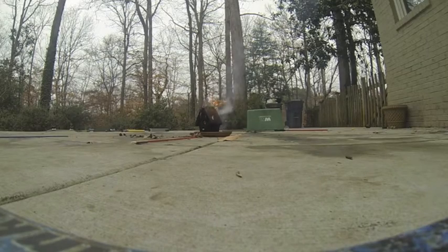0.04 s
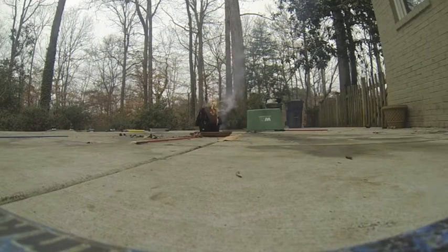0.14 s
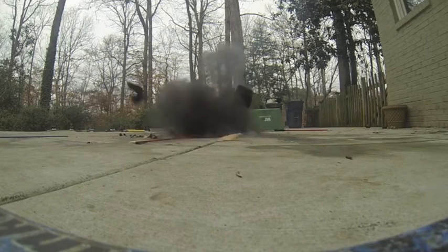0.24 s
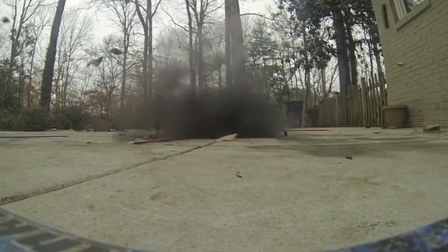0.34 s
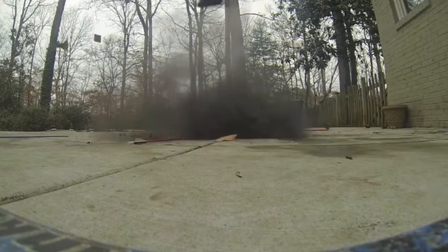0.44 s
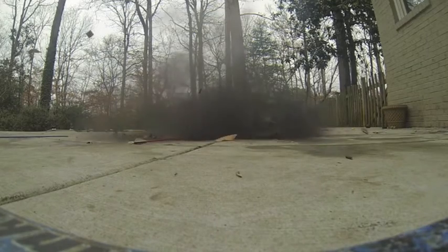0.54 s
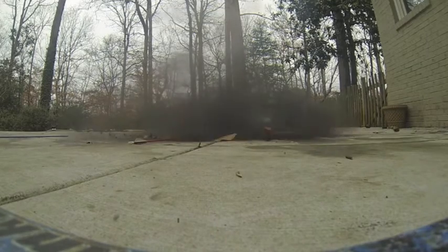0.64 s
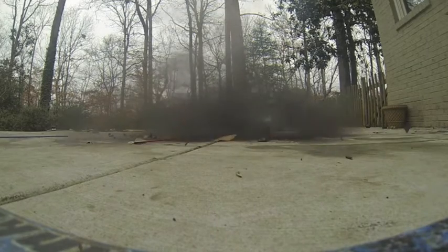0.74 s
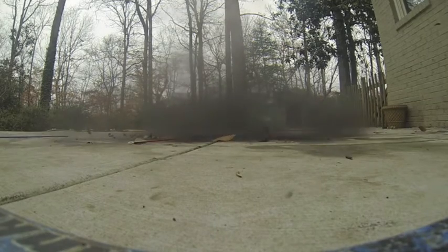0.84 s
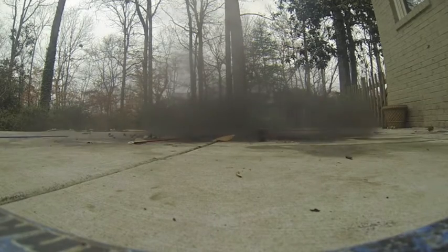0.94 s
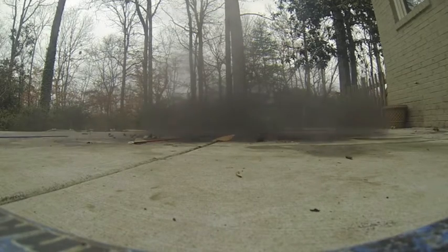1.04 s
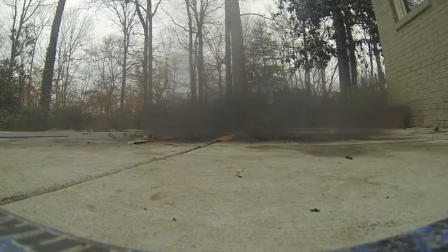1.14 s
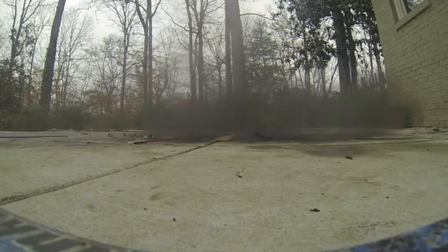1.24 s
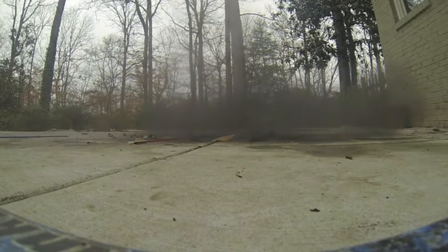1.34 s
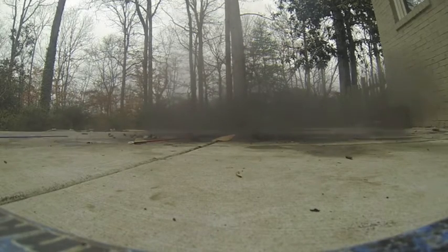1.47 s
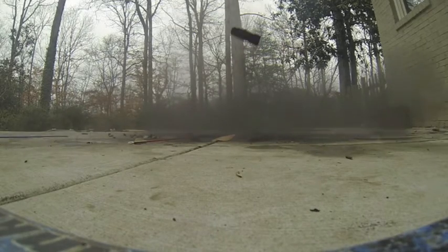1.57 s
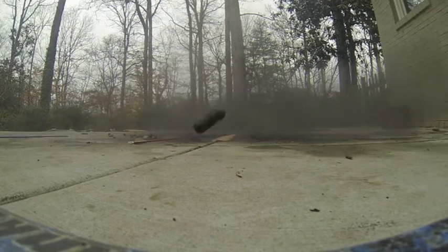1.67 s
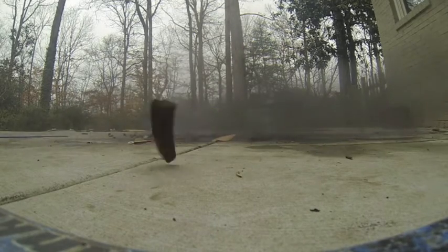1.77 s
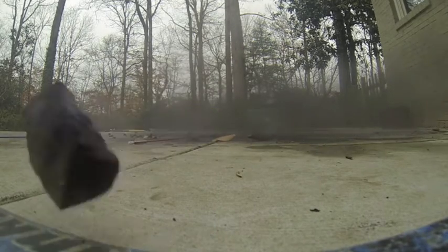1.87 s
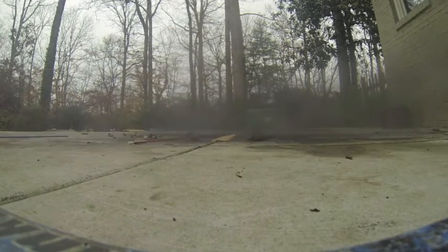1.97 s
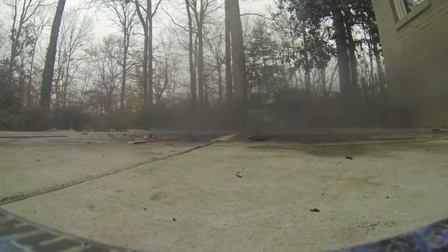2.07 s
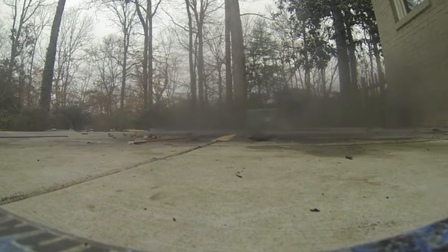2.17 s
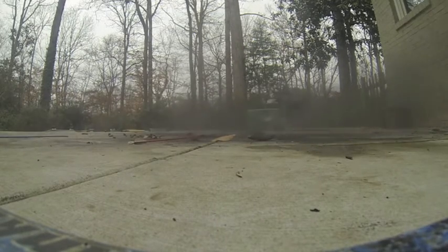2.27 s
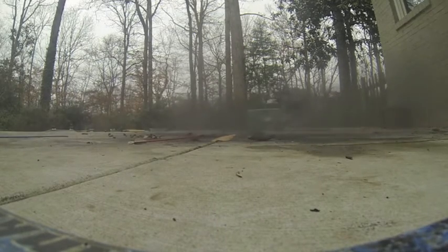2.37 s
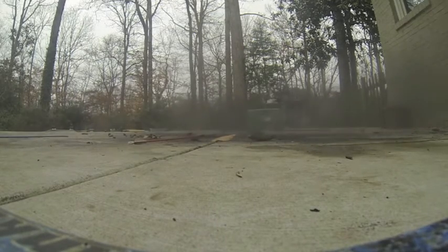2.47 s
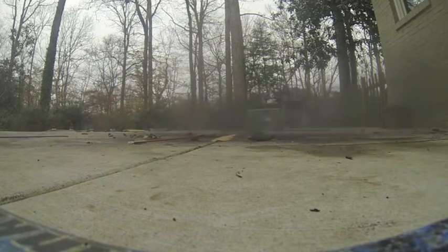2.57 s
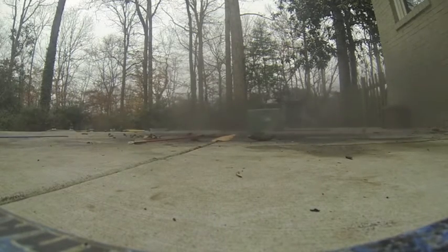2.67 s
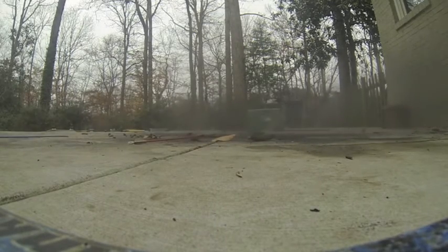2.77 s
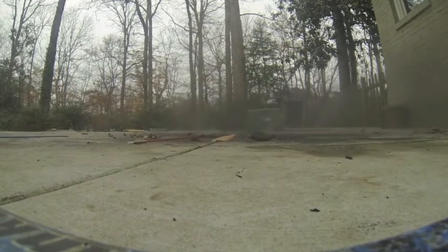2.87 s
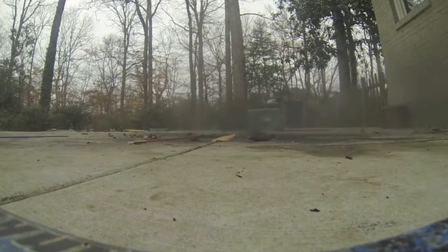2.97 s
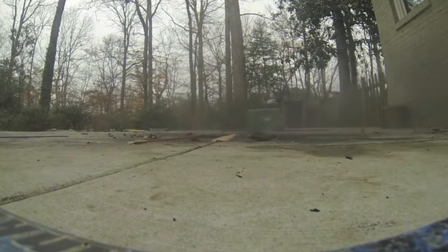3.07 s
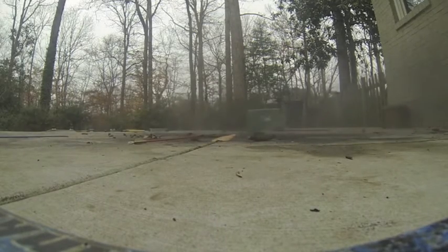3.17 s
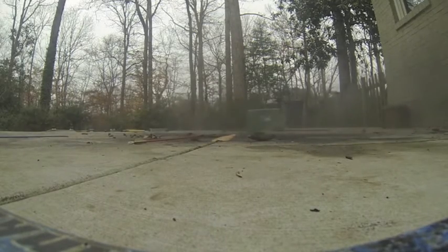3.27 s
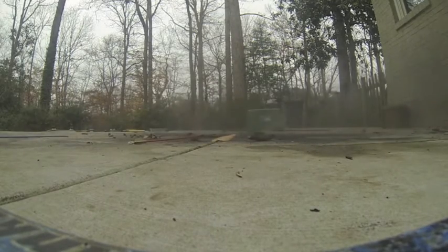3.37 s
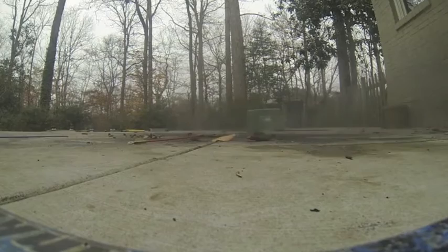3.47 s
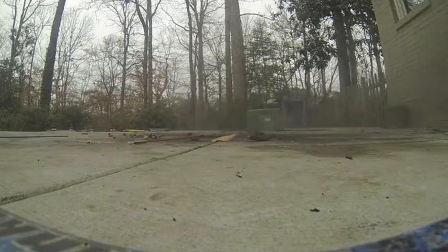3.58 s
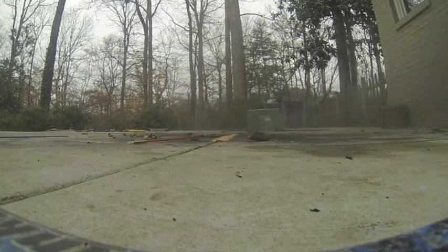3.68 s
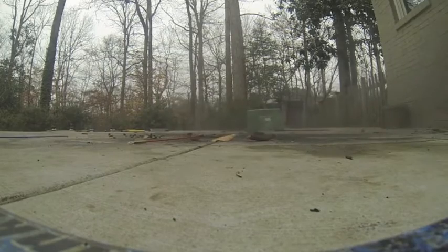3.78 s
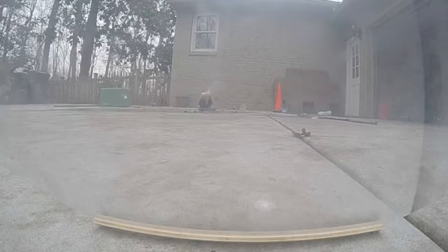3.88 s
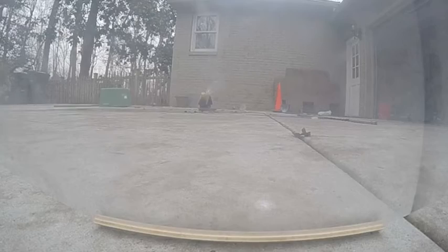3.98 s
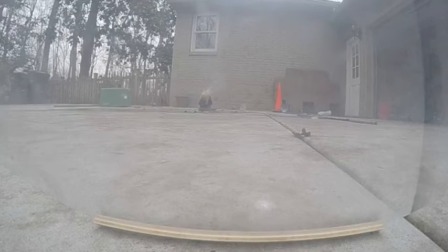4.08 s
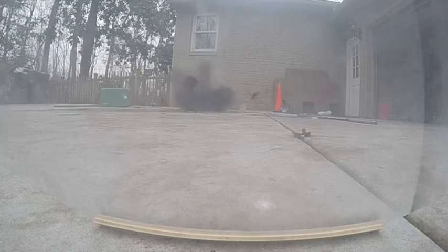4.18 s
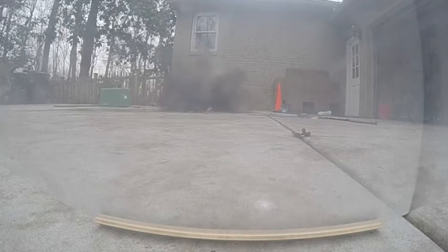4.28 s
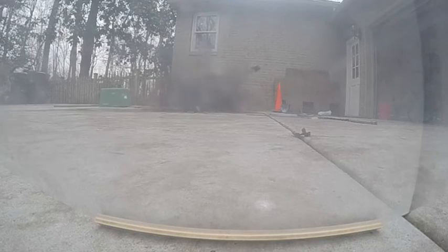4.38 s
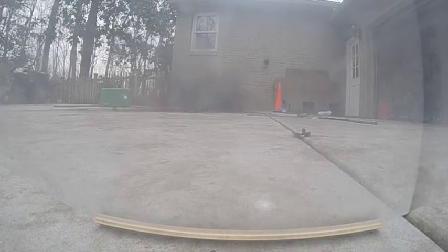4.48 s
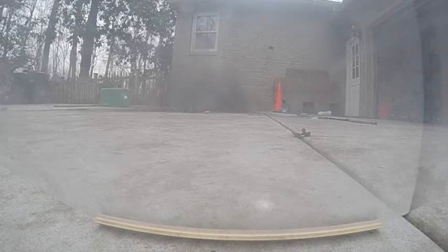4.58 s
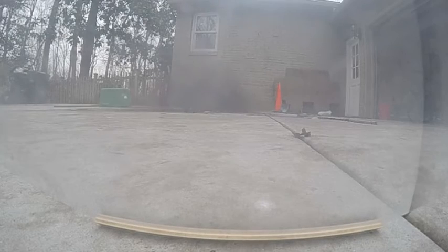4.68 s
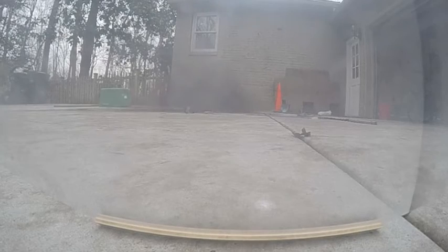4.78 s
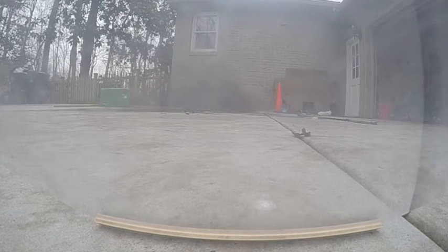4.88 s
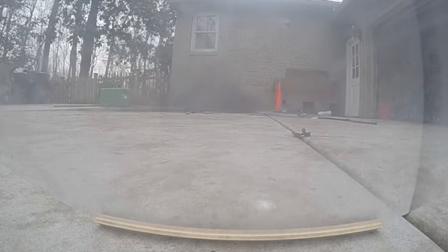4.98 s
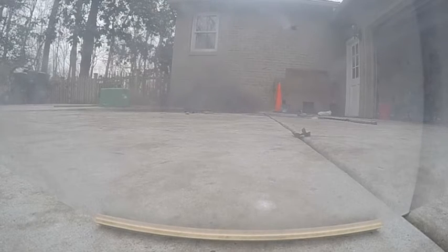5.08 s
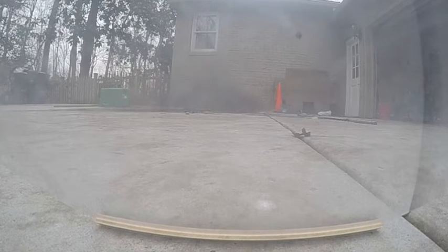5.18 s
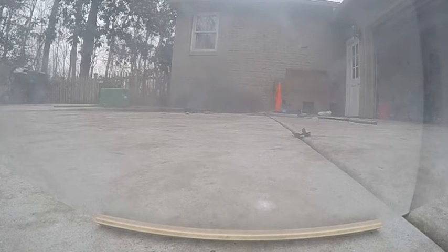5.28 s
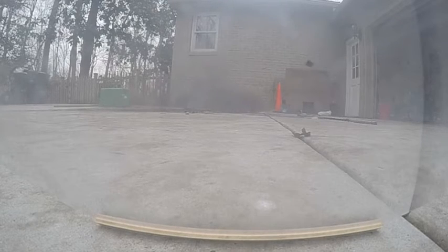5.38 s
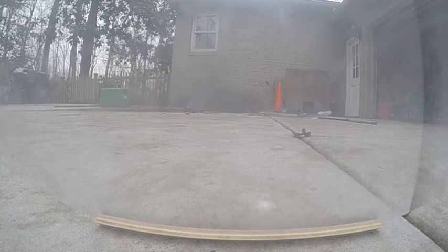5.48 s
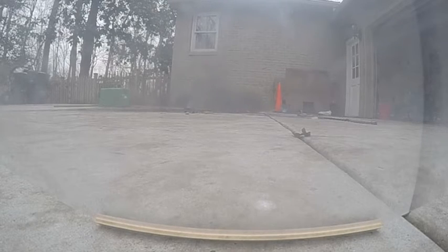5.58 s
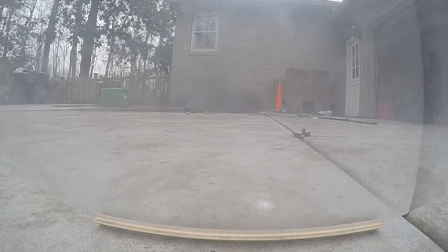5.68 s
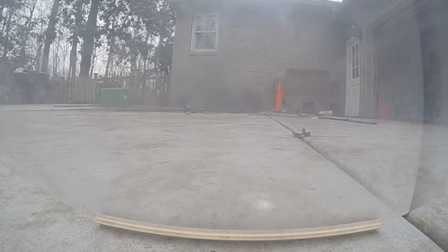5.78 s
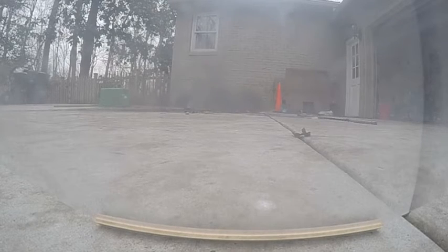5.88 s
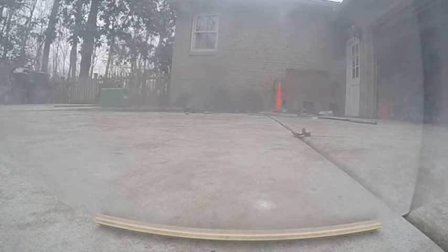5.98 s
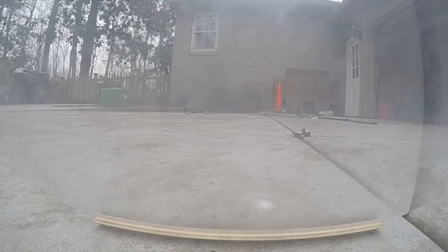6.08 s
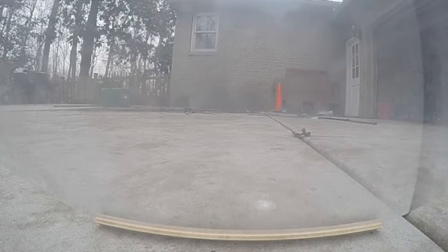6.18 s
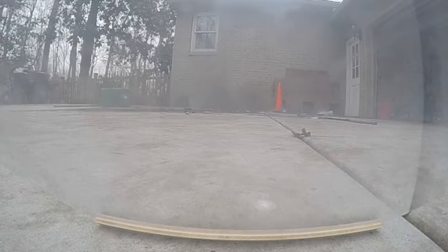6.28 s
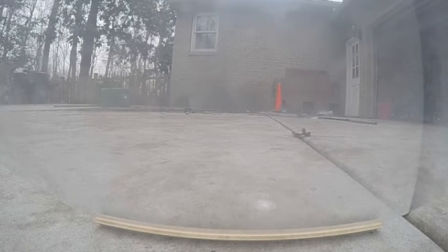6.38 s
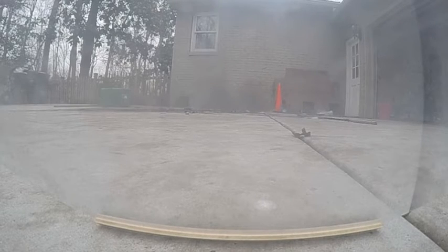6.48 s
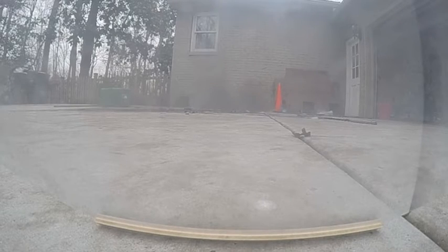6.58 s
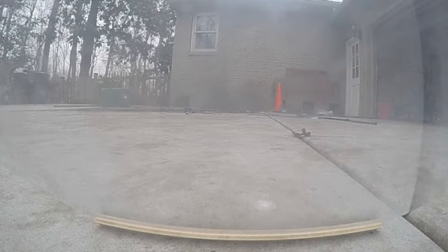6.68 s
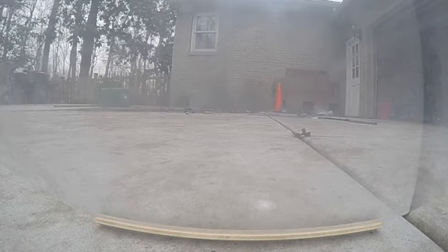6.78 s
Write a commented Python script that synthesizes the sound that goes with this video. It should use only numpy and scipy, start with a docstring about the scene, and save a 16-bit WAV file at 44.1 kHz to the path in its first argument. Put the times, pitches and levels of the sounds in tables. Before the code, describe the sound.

A sharp overloaded bang cracks across a concrete yard, wood and ringing metal clatter down, then a second, duller bang drops lighter debris.

```python
"""A blast bursts out of faint hiss on a concrete driveway between a house and a wood; a second scene brings another.
Each is a push-and-suction pulse with a noise crack that overloads the microphone of a small cased camera,
slaps back from the walls as weaker copies and rolls away through the trees as noise dying band by band.
Then wood and grit (noise bursts), ringing steel (decaying sines) and a shower of crumbs (random grains) come down.
Hiss, rumble and a faint whine lie beneath; a short dip in level joins the two scenes."""
import sys
import numpy as np
from scipy import signal
from scipy.fft import rfft, irfft
from scipy.io import wavfile
from scipy.ndimage import uniform_filter1d, map_coordinates

SR = 44100
rng = np.random.default_rng(int(sys.argv[2]) if len(sys.argv) > 2 else 0)


def to_wav(s):
    """Save 16-bit WAV."""
    ch = np.atleast_2d(s).T  # columns
    pcm = np.round(np.clip(ch, -1, 1) * 32767)  # PCM
    wavfile.write(sys.argv[1], SR, pcm.astype(np.int16))


N = 301203
T = np.arange(N) / SR
CUT_S = 3.91   # the second scene starts here

# tone of each camera case with its hollow resonances: freq_hz, level_db
CASE_A_TONE = [(50, -23), (170, -8.5), (400, -7.5), (730, -15.5), (900, -12.5), (1080, -21), (1300, 2),
               (1750, -2), (2080, -18), (2350, -7.5), (2700, -22.5), (3150, -14), (4200, -31),
               (8000, -38.5), (10000, -50), (15000, -57.5)]
CASE_B_TONE = [(40, -9), (190, 3), (400, -0.5), (620, -13), (750, -9), (1100, -15.5), (1550, -8.5),
               (1900, -5), (3200, -11.5), (4100, -17), (4600, -25), (6000, -23), (8000, -33),
               (15000, -37.5)]
# the two blasts: start_s, pressure_db, push_s, crack_db, crack_t60_s,
# slap_crack_db (crack of a wall echo relative to its pressure)
BLASTS = [(.1770, 16.5, 0.0009, 2.5, .013, 0.5), (4.1988, 10, 0.0021, -5.5, 0.017, -15)]


def from_db(db):
    """Decibels to gain."""
    return 10 ** (np.asarray(db) / 20)


def rms_one(x):
    """Scale to unit rms."""
    return x / np.sqrt(np.mean(x ** 2) + 1e-20)


def fall(t, t60):
    """Exponential decay from t = 0, down 60 dB after t60 seconds."""
    return (t >= 0) * np.exp(-np.log(1000) * np.clip(t / t60, 0, 10))


def add(out, start_s, sound):
    """Mix a sound into out at start_s."""
    start = max(round(start_s * SR), 0)
    out[start:start + len(sound)] += sound[:N - start]


def band(x, low_hz, high_hz, order=3):
    """Causal Butterworth band-pass."""
    edges_hz = [low_hz, min(high_hz, .45 * SR)]
    sos = signal.butter(order, edges_hz, "band", fs=SR, output="sos")
    return signal.sosfilt(sos, x + 1e-18)


def resonance(x, freq_hz, width_hz):
    """Two-pole peak filter: one ringing mode."""
    return signal.lfilter(*signal.iirpeak(freq_hz, freq_hz / width_hz, fs=SR), x)


def coloured(x, spectrum, size=4096):
    """Minimum-phase filter that follows a (freq_hz, level_db) table, built by folding the cepstrum."""
    hz, db = np.transpose(spectrum)
    grid_hz = np.maximum(np.arange(size // 2 + 1) * SR / size, 1)
    gain = from_db(np.interp(np.log(grid_hz), np.log(hz), db))
    cepstrum = irfft(np.log(gain))
    cepstrum[1:size // 2] *= 2
    cepstrum[size // 2 + 1:] = 0
    impulse = irfft(np.exp(rfft(cepstrum)))
    return signal.fftconvolve(x, impulse)[:len(x)]


def three_bands(x):
    """Bass, middle and treble, each at unit rms."""
    # band limits: edge_hz
    edges_hz = [30, 1000, 4300, 16000]
    return [rms_one(band(x, low, high)) for low, high in zip(edges_hz, edges_hz[1:])]


def burst(noise, start_s, t60, rise_s, size=176):
    """A dying stretch of noise whose loudest few milliseconds have unit rms."""
    piece = noise[round(start_s * SR):][:int(min(t60 + .02, 1) * SR)]
    t = T[:len(piece)]
    piece = piece * fall(t, t60) * (1 - np.exp(-t / rise_s))
    loudest = uniform_filter1d(piece ** 2, size, mode="constant").max()
    return piece / np.sqrt(loudest)


def wander(per_s, size=4096):
    """Smooth random wobble of about unit spread: per_s random points a second, joined by splines."""
    return map_coordinates(rng.standard_normal(size), [T * per_s], order=3, mode="wrap")


def through_cases(x):
    """Each scene takes the tone of its own camera case."""
    first = rms_one(coloured(x, CASE_A_TONE))
    second = rms_one(coloured(x, CASE_B_TONE))
    return np.where(T < CUT_S, first, second)


def shocks(front_s=.00007, low_a_hz=300, low_b_hz=135, case_hz=900, case_width_hz=330, case_db=3):
    """A sudden push, a longer suction, and the crack of the bursting shell; each wall returns a weaker copy."""
    # echoes off the nearest walls: start_s, pressure_db
    slap_rows = [(0.1877, -10.5), (0.1943, -14.5), (0.23, -20), (.268, -19.5), (4.2158, 1), (4.2212, -10.5),
                 (4.249, -8.5), (4.291, -19)]
    slap_t60_s = .02
    pressure, crack, t = np.zeros(N), np.zeros(N), T[:SR // 10]
    noise = band(through_cases(rng.standard_normal(N)), 330, 15000, order=1)
    for blast_s, blast_db, push_s, shell_db, shell_t60, slap_crack_db in BLASTS:
        waves = [(blast_s, blast_db, shell_db, shell_t60)]
        waves += [(s, db, db + slap_crack_db, slap_t60_s) for s, db in slap_rows if 0 < s - blast_s < 1]
        for s, push_db, crack_db, t60 in waves:
            # weaker waves have rounder fronts
            front = (1 - np.exp(-t * np.sqrt(from_db(push_db)) / front_s)) ** 2
            push_and_suction = (1 - t / push_s) * np.exp(-t / push_s)
            add(pressure, s, from_db(push_db) * front * push_and_suction)
            add(crack, s, from_db(crack_db) * burst(noise, s, t60, rise_s=0.0001))
    # the cases keep out the deepest part of the wave, and the first one rings briefly
    first = band(pressure, low_a_hz, 4100, order=2)
    second = band(pressure, low_b_hz, 9000, order=2)
    ring = from_db(case_db) * resonance(first, case_hz, case_width_hz)
    return np.where(T < CUT_S, first + ring, second) + crack


def roll(rows, case, lumpy_db, low_hz, rise_s=.003):
    """Countless echoes of uneven strength merge into a tail that dies band by band."""
    lumps = from_db(lumpy_db * wander(per_s=200))
    echoes = coloured(rng.standard_normal(N) * lumps, case)
    out = np.zeros(N)
    for (start_s, db, t60), noise in zip(rows, three_bands(band(echoes, low_hz, 18000, order=2))):
        rise = np.clip((T - start_s) / rise_s, 0, 1)
        out += from_db(db) * rise * fall(T - start_s, t60) * noise
    return out


def rolls():
    """Blast tails through the trees; half-plain, half-hollow in the second scene."""
    # one row each for bass, middle, treble: start_s, relative_level_db, t60_s
    rows_a = [(.19, -22, .95), (.20, -17, 1.155), (.185, -41.5, 2.9)]
    rows_b = [(4.203, -19, 0.45), (4.203, -17.5, 0.48), (4.203, -31, 0.41)]
    first = roll(rows_a, CASE_A_TONE, lumpy_db=1.42, low_hz=135)
    second = roll(rows_b, CASE_B_TONE, lumpy_db=0.6, low_hz=105)
    return first + from_db(-8.5) * (second + walls(second))


def impacts(rows, crack_db, rise_s, crunch_db):
    """Splintered wood is heavily damped: each landing is a short, crunchy rush of thud, clack and crack."""
    crunch = from_db(crunch_db * wander(per_s=250))
    rush = through_cases(rng.standard_normal(N) * crunch)
    out, bands = np.zeros(N), three_bands(band(rush, 95, 16000, order=2))
    for start_s, clack_db, thud_db, t60 in rows:
        levels_db = (thud_db, clack_db, clack_db + crack_db)
        for db, noise in zip(levels_db, bands):
            add(out, start_s, from_db(db) * burst(noise, start_s, t60, rise_s))
    return out


def knocks(t60_s=0.028):
    """Wooden pieces strike the slab nearby; the damped wood gives all the same short decay."""
    # landings: start_s, clack_db, thud_db
    rows = [(.809, -27.5, -53), (1.492, -34.5, -48), (1.582, -21, -35), (1.604, -12.5, -57),
            (1.619, -38, -56), (1.733, -29.5, -56), (1.767, -43, -45), (1.833, -22, -37.5),
            (1.839, -29, -53), (2.04, -31, -52), (2.134, -37, -68), (4.86, -38, -53), (5.641, -41, -66)]
    return impacts([(*row, t60_s) for row in rows], crack_db=-22, rise_s=0.00029, crunch_db=-0.5)


def crashes():
    """Heavy pieces crash down farther off, each with its own decay."""
    # landings, levels ahead of the walls: start_s, clack_db, thud_db, t60_s
    rows = [(.838, -21, -36, 0.097), (.850, -26.5, -34, 0.94), (1.00, -36.5, -75, 1),
            (1.409, -32.5, -47, 0.2), (1.605, -24, -61, 0.33), (1.892, -37, -56, 0.33),
            (1.918, -31, -47.5, 0.57), (2.425, -55.5, -60, 0.54), (4.860, -41.5, -47, 0.88),
            (5.630, -47, -68, 0.44), (5.948, -44, -70, 0.33)]
    return walls(impacts(rows, crack_db=-26, rise_s=0.00064, crunch_db=2.1))


def steel(upper_hz=4500, clank_t60=0.038, flutter_db=4.0, smear_rad=1.0, damp_t60=0.063, size=26000):
    """Each bounce clanks and strikes every mode anew; the piece tumbles, so its ring flutters."""
    # bounces, a corner brighter than a flat face: start_s, ring_db, brightness_db
    bounces = [(1.112, -34, 1), (1.303, -39, 6), (1.547, -29.5, -12), (1.575, -30, 3), (1.739, -38.5, 12),
               (1.788, -42, 5), (2.001, -37, -11), (2.125, -50, 12), (2.135, -37.5, -1), (2.256, -37, -1.5),
               (2.286, -38.5, 3), (2.425, -55, -4), (2.485, -60.5, 7), (5.136, -46, -5.5),
               (5.326, -50.5, -11.5), (5.572, -38, -26), (5.600, -43.5, -1), (5.642, -38, -17),
               (5.765, -44, -3), (6.027, -38.5, -27), (6.148, -44, -6), (6.280, -48, -18), (6.309, -50, -4),
               (6.379, -57, 0)]
    # modes of the piece: freq_hz, relative_level_db, t60_s
    modes = [(2326, -22, 0.31), (3004, -4.5, 0.097), (3250, -9, 0.13), (3038, -0.5, .3),
             (3320, -15.5, 0.19), (4040, -22, 0.17), (5214, -2, 0.36), (5750, -8.5, 0.23), (7050, 6, 0.042),
             (7460, -2, 0.14), (8970, -18, 0.16), (10400, -9.5, 0.088), (13030, -9, 0.088)]
    # tone of the short clank on concrete: freq_hz, level_db
    clank_tone = [(900, -32.5), (1900, -6.5), (2300, -12), (2650, -47), (3000, 7.5), (3350, -6.5),
                  (3900, -23.5), (5200, -16), (6200, -25.5), (7200, -37), (8500, -29.5), (15000, -47)]
    upper_modes_db = -13   # relative to the ring
    # clank at the first landing; its loss as the hops get lower; its share of the brightness
    first_clank_db, clank_loss_db_per_s, clank_follows = 9.5, 14, 0.52
    out, t = np.zeros(N), T[:size]
    contact = coloured(rng.standard_normal(N), clank_tone)
    facing, swing = wander(per_s=60), wander(per_s=60)
    starts = rng.integers(0, N - size, (len(bounces), len(modes)))
    decays = [fall(t, t60) for hz, db, t60 in modes]
    landings = [row[0] for row in bounces] + [T[-1]]
    for (s, ring_db, bright_db), row, next_s in zip(bounces, starts, landings[1:]):
        first_s = min(other for other in landings if (other < CUT_S) == (s < CUT_S))
        loss_db = clank_loss_db_per_s * (s - first_s)
        clank_db = ring_db + first_clank_db - loss_db + clank_follows * bright_db
        add(out, s, from_db(clank_db) * burst(contact, s, clank_t60, rise_s=0.00054))
        upper_db = ring_db + upper_modes_db + bright_db
        damping = fall(np.maximum(t - (next_s - s), 0), damp_t60)   # the next contact stills the ring
        for (hz, mode_db, t60), decay, start in zip(modes, decays, row):
            turn = slice(start, start + size)
            strike_db = upper_db if hz > upper_hz else ring_db
            level = from_db(strike_db + mode_db + flutter_db * facing[turn])
            doppler = smear_rad * swing[turn] * (hz / upper_hz) ** 2   # motion smears the high modes most
            add(out, s, level * decay * damping * np.sin(2 * np.pi * hz * t + doppler))
    return out


def ticks(t60=0.023, level_db=-1):
    """Grit snaps brightly against the concrete and sand skitters over the slab."""
    # small stones and splinters: start_s, relative_level_db
    snaps = [(.4438, -33), (0.675, -44), (0.695, -41), (0.9897, -49), (1.026, -51), (1.218, -47.5),
             (1.420, -52), (1.601, -25), (1.698, -37), (4.6912, -43), (5.006, -58), (5.386, -57.5),
             (5.0897, -53), (5.492, -48), (6.3405, -54.5)]
    # sand sprays: start_s, level_db, t60_s
    sprays = [(.806, -56, 0.11), (.990, -52.5, 0.92), (1.399, -45.5, 0.58), (1.477, -49.5, 0.82),
              (1.603, -45, 0.27), (5.421, -52.5, 1), (5.492, -62.5, 0.95), (5.638, -57, 0.79)]
    # tone of grit and sand: freq_hz, level_db
    sand_tone = [(1000, -14), (3500, 12), (5500, 3), (7800, 3), (10000, -5.5), (15000, -10)]
    out = np.zeros(N)
    noise = coloured(rng.standard_normal(N), sand_tone)
    for start_s, db in snaps:
        add(out, start_s, from_db(db + level_db) * burst(noise, start_s, t60, rise_s=.0004))
    grainy = noise * from_db(3.5 * wander(per_s=400))
    for start_s, db, spray_t60 in sprays:
        add(out, start_s, from_db(db) * burst(grainy, start_s, spray_t60, rise_s=0.0022))
    return out


def skids(rise_s=0.0055, grit_db=4.0):
    """Something hard scrapes over the concrete: noise made uneven, like a dense run of tiny clanks."""
    # scrapes: start_s, level_db, t60_s
    scrapes = [(1.604, -27, .22), (5.632, -35.5, 0.45)]
    # tone of a scrape: freq_hz, level_db
    scrape_tone = [(900, -31), (1600, -3.5), (2400, 2), (3300, 7.5), (4100, -5.5), (5200, -24), (9000, -29),
                   (15000, -38)]
    out = np.zeros(N)
    grit = from_db(grit_db * wander(per_s=300))
    noise = coloured(rng.standard_normal(N) * grit, scrape_tone)
    for start_s, db, t60 in scrapes:
        add(out, start_s, from_db(db) * burst(noise, start_s, t60, rise_s))
    return out


def booms(rise_s=0.00082, waver_db=2.5):
    """Decaying sines hang on after a blow; in the first scene they waver as they fade."""
    # landings of a hollow, hopping piece: start_s, level_db
    hops = [(1.582, -0.5), (1.769, -14.5), (2.041, -20)]
    # modes of the hollow piece: freq_hz, relative_level_db, t60_s
    hollow_modes = [(63.1, -41, 1.3), (188.9, -26, 0.29), (191, -43, 2.16)]
    # other things set booming once: start_s, freq_hz, level_db, t60_s
    single_booms = [(.835, 156, -32.5, 0.29), (.840, 219, -40, 0.36), (4.20, 137.5, -30, 0.31),
                    (4.21, 59.5, -52, 11), (5.95, 735, -58.5, 1.2)]
    out = np.zeros(N)
    notes = [(s, hz, hop_db + mode_db, t60) for s, hop_db in hops for hz, mode_db, t60 in hollow_modes]
    for start_s, hz, db, t60 in notes + list(single_booms):
        t = T[:int(min(t60, 3) * SR)]
        envelope = fall(t, t60) * (1 - np.exp(-t / rise_s))
        add(out, start_s, from_db(db) * np.sin(2 * np.pi * hz * t) * envelope)
    return out * from_db(waver_db * wander(per_s=25) * (T < CUT_S))


def shower(start_s, fallout, case, per_s, spread_db, wash, clump_db, rise_s=.1):
    """Crumbs of many sizes patter down in clumps over the wash of their own echoes, thin out and die away."""
    end_s, level_db, thinning_db_per_s, dying_db_per_s, bass_db, treble_db = fallout
    sizes = from_db(spread_db * np.minimum(rng.exponential(1, N), 4)) * rng.choice([-1, 1], N)
    landed = rng.random(N) < per_s / SR
    grains = rms_one(sizes * landed) + wash * rng.standard_normal(N)
    bass, middle, treble = three_bands(band(coloured(grains, case), 91, 16000, order=1))
    mix = from_db(bass_db) * bass + middle + from_db(treble_db) * treble
    db = level_db + clump_db * wander(per_s=20)
    db = db - thinning_db_per_s * (T - start_s)
    db = db - dying_db_per_s * np.maximum(T - end_s, 0)   # the highest crumbs have landed
    onset = np.clip((T - start_s) / rise_s, 0, 1)
    return onset * from_db(db) * mix


def showers():
    """Fine debris rains down after each blast."""
    # last_landing_s, level_db, thinning_db_per_s, dying_db_per_s, bass_db, treble_db
    fallout_a = (2, -40.5, 3.5, 55, -9, -17.5)
    fallout_b = (6.0, -51.5, 3, 39, -8.5, -13)
    first = shower(BLASTS[0][0], fallout_a, CASE_A_TONE, per_s=700, spread_db=6.0, wash=0.99, clump_db=0.8)
    second = shower(BLASTS[1][0], fallout_b, CASE_B_TONE, per_s=590, spread_db=3.0, wash=1.0, clump_db=2.5)
    return first + second


def yard(x, t60=0.79, gap_s=0.015, top_hz=5500):
    """Scattered echoes from walls and trunks: convolution with decaying noise."""
    echoes = rng.standard_normal(SR) * fall(T[:SR] - gap_s, t60)
    echoes = echoes / np.sqrt(np.sum(echoes ** 2))
    echoes = band(echoes, 83.0, top_hz, order=1)
    return signal.fftconvolve(x, echoes)[:N]


def walls(x, plain_db=-4):
    """In the second scene the house walls lend the sound a hollow ring through narrow resonances."""
    # wall resonances: freq_hz, width_hz, level_db
    wall_modes = [(525, 45, 3.5), (735, 20, 7), (937, 3.2, 12.5), (1887, 47, 2), (2380, 27, 0.5),
                  (2924, 210, 1.5), (4170, 140, 1.5)]
    late = x * (T > CUT_S)
    rings = sum(from_db(db) * resonance(late + 1e-18, hz, width_hz) for hz, width_hz, db in wall_modes)
    return x - late + from_db(plain_db) * late + rings


def air():
    """Outdoor rumble and microphone hiss: steady coloured noise for each scene."""
    # noise spectrum of each scene: freq_hz, relative_db_per_hz
    tone_a = [(15, -7.5), (40, 3.5), (95, -3.5), (250, -13.5), (750, -19.5), (2500, -26), (3300, -21.5),
              (4500, -31), (8000, -32.5), (12000, -32.5), (15500, -38)]
    tone_b = [(20, -1), (60, 0.5), (150, -9.5), (400, -16.5), (1000, -24), (3000, -26), (6000, -29.5),
              (15000, -36)]
    first = from_db(-58) * rms_one(coloured(rng.standard_normal(N), tone_a))
    second = from_db(-66.5) * rms_one(coloured(rng.standard_normal(N), tone_b))
    return np.where(T < CUT_S, first, second)


def whine(pitch_hz=6428, pulses_per_s=48, level_db=-66, octave_db=-5, duty=0.28):
    """The first camera's electronics whistle faintly, a tone and its octave pulsed once for every picture."""
    on = uniform_filter1d(1.0 * (T * pulses_per_s % 1 < duty), size=60)   # softened edges
    phase = 2 * np.pi * pitch_hz * T
    tone = np.sin(phase) + from_db(octave_db) * np.sin(2 * phase)
    return from_db(level_db) * on * (T < CUT_S) * tone


def scene():
    """Blasts, falling pieces and their echoes over the quiet yard."""
    blasts = shocks() + rolls()
    wood = knocks() + crashes()
    hard = steel() + ticks() + skids()
    hard = np.where(T < CUT_S, hard, band(hard, 940, 8600, order=1))   # in the second scene these come from farther off and sound duller
    echoes = yard(from_db(-14.5) * wood + from_db(-11) * hard)
    distant = walls(showers() + echoes)
    return (blasts + wood + hard + booms() + distant + air() + whine())[None]


def record(dry, ceiling_a=0.99, ceiling_b=0.39, soft_hz=12000, cutoff_hz=15700):
    """Each camera overloads at its own ceiling and softens the top; the sound fades across the cut."""
    # level across the cut: time_s, gain
    fade = [(0, 0.97), (3.8, 0.98), (3.9, 0.044), (3.92, 0.18), (4.02, 1)]
    ceiling = np.where(T < CUT_S, ceiling_a, ceiling_b)
    clipped = dry / (1 + (dry / ceiling) ** 8) ** (1 / 8)
    softened = signal.lfilter(*signal.butter(1, min(soft_hz, .45 * SR), fs=SR), clipped)
    faded = softened * np.interp(T, *np.transpose(fade))
    return signal.sosfilt(signal.ellip(10, .1, 80, cutoff_hz, fs=SR, output="sos"), faded)


dry = scene()
out = record(dry)
to_wav(out)
```